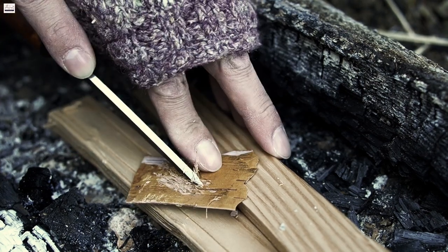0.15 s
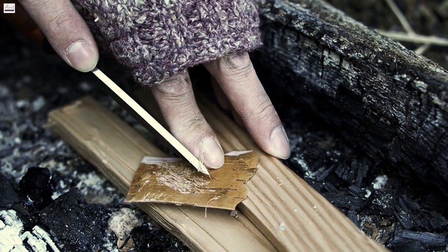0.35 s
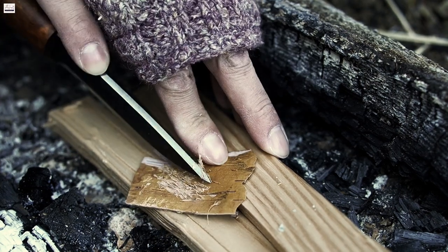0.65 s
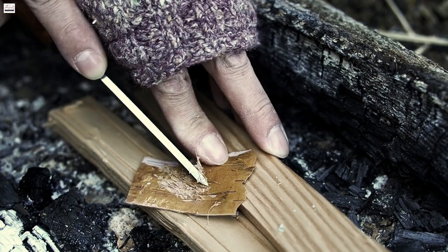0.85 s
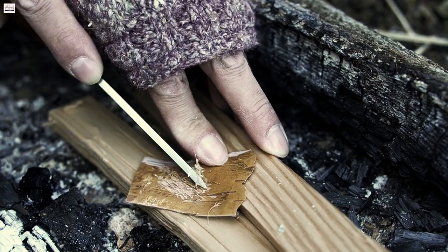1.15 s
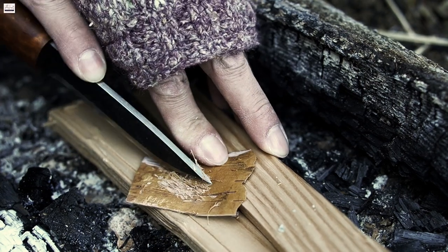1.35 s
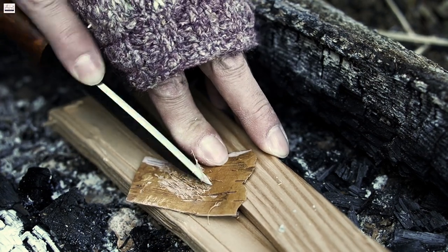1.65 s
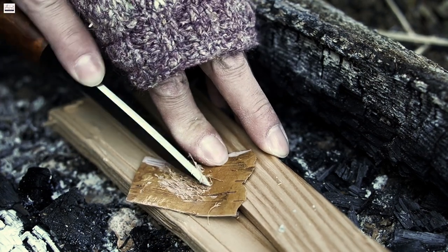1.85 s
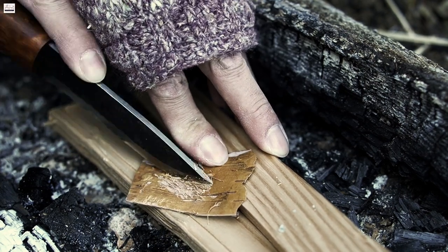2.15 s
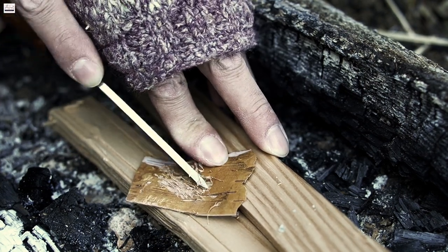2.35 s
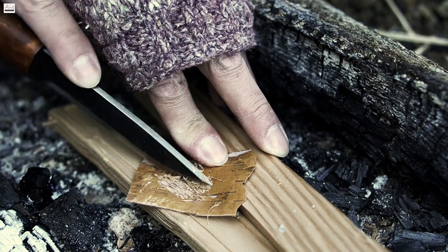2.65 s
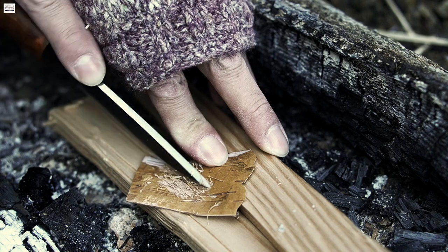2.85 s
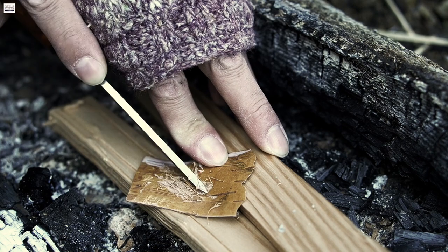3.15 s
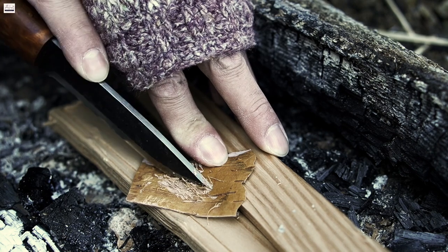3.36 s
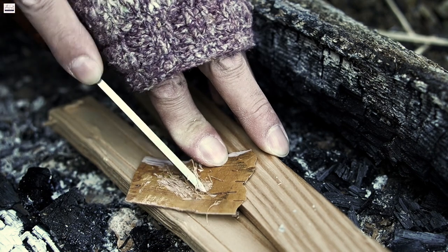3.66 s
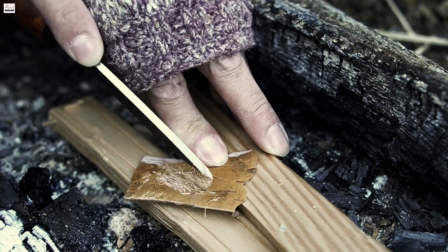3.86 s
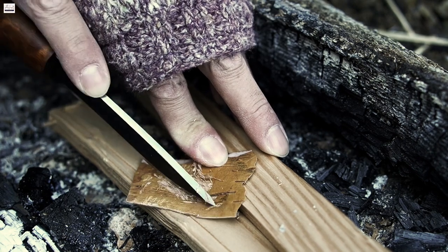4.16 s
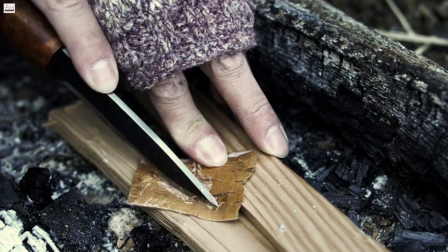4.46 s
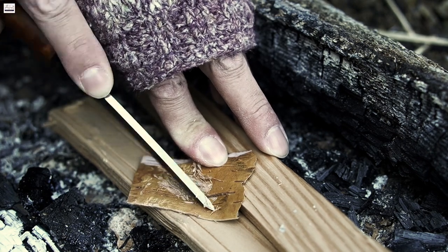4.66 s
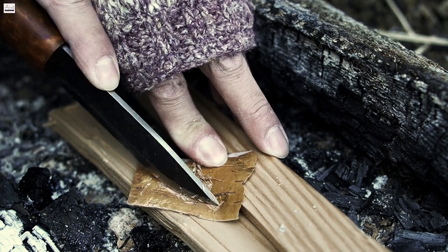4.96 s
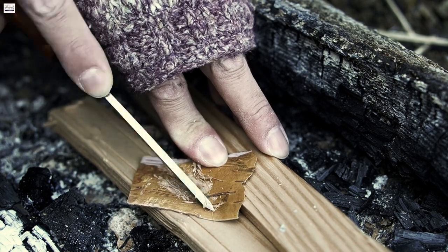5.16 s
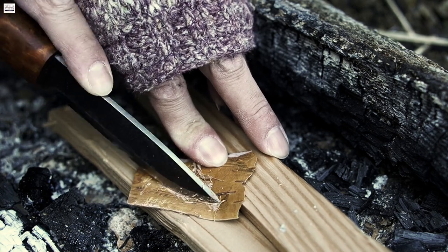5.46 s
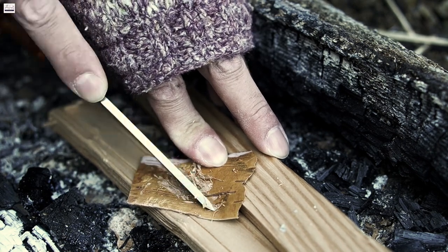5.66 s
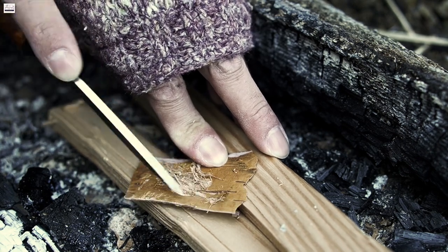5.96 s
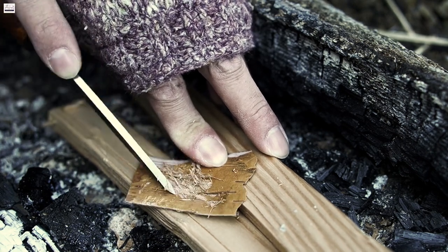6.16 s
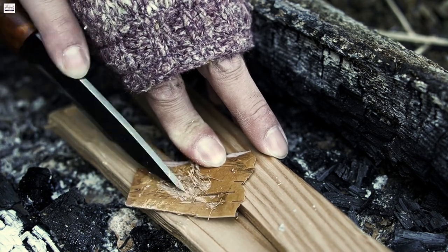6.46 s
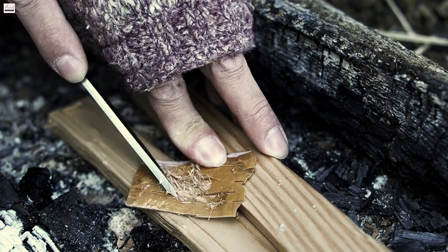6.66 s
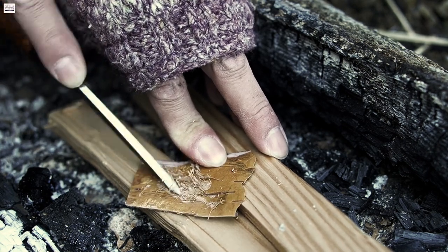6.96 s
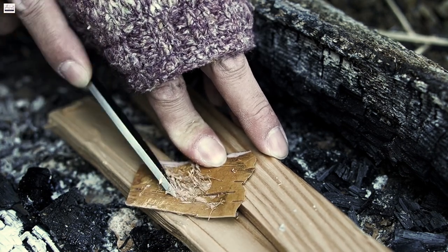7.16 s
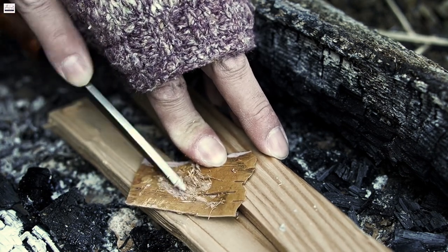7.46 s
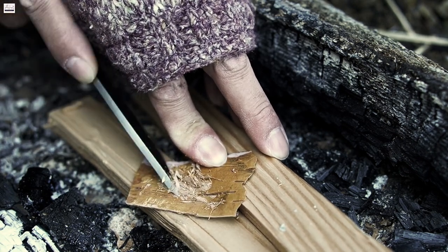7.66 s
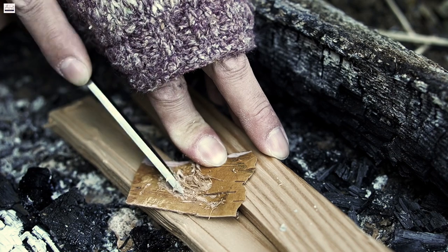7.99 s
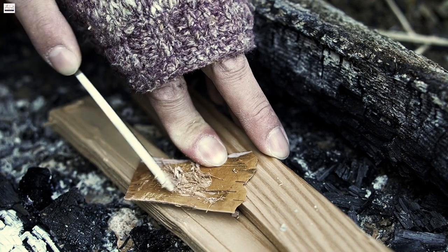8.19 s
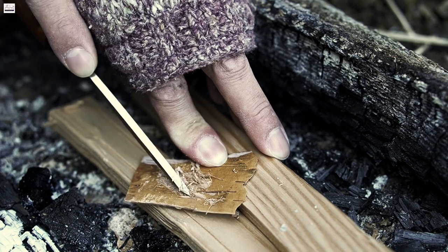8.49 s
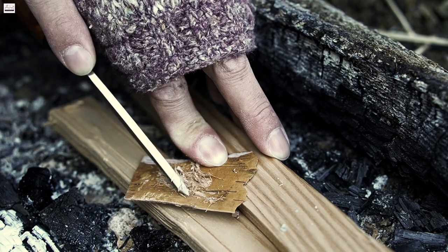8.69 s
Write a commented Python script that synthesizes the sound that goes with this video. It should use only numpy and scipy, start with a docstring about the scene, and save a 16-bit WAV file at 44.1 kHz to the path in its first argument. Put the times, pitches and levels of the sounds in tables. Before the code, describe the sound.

Very close outdoors, a knife edge rasps dry bark held on a split board, about five or six short strokes a second. Brittle flakes snap sharply, the board gives small knocks and low thuds, mostly at the start. Strokes become crisper and cracklier midway, then lighter and thinner. Behind lies a faint steady rush with hiss and a tiny high trill now and then.

```python
"""Scraping bark with a knife edge

A knife edge scrapes a dry strip of bark on a split board, five or six strokes a second, heard close by.
The rasp is random tears ringing the modes of strip and fibres; snapping flakes are short blows to those modes.
The board answers with decaying knocks, a noise-driven rumble and low thuds.
Behind it lie shaped noise, a far rush with a hump near 1 kHz and a hiss, and a faint thin frequency-modulated trill."""
import sys
import numpy as np
from scipy import signal
from scipy.fft import rfft, irfft, next_fast_len
from scipy.io import wavfile
from scipy.ndimage import uniform_filter1d, map_coordinates

SR = 44100
rng = np.random.default_rng(int(sys.argv[2]) if len(sys.argv) > 2 else 0)


def to_wav(s):
    """Save 16-bit WAV."""
    ch = np.atleast_2d(s).T  # columns
    pcm = np.round(np.clip(ch, -1, 1) * 32767)  # PCM
    wavfile.write(sys.argv[1], SR, pcm.astype(np.int16))


N = 389403  # length in samples


def amp(db):
    """Decibels to amplitude ratio: 20 dB is a factor of ten."""
    return 10 ** (np.asarray(db) / 20)


def unit(x):
    """Normalisation to an rms of 1."""
    return x / np.sqrt(np.mean(x ** 2) + 1e-20)


def along(points, hz):
    """Spectral envelope: (Hz, value) points joined on a logarithmic frequency axis."""
    f, v = np.transpose(points)
    return np.interp(np.log(hz + 1), np.log(f + 1), v)


def curves(rows):
    """Linear interpolation: one value per sample for each column after the time."""
    s, *columns = np.transpose(rows)
    return [np.interp(np.arange(N) / SR, s, column) for column in columns]


def wobble(rate):
    """Slow random modulation: a smooth curve through rate random knots a second."""
    knots = rng.standard_normal(int(N * rate / SR) + 4)
    return map_coordinates(knots, [np.arange(N) * rate / SR])


def bumps(rows, rise_db_s, fall_db_s):
    """Exponential growth and decay: the gain rises to each (s, dB) peak and fades."""
    t = np.arange(0, N / SR, .002)
    gain = sum(amp(db - np.maximum(rise_db_s * (s - t), fall_db_s * (t - s))) for s, db in rows)
    return np.interp(np.arange(N) / SR, t, gain)


def filtered(x, response):
    """Linear filtering: the spectrum times a response of frequency, zero-padded."""
    m = next_fast_len(N + SR // 2)
    return irfft(rfft(x, m) * response(np.fft.rfftfreq(m, 1 / SR)), m)[..., :N]


def body(modes, f):
    """Modal superposition: causal resonances summed with alternating sign."""
    total = 0
    for k, (centre, width, db) in enumerate(modes):
        resonance = 1j * f * width / (centre ** 2 - f ** 2 + 1j * f * width)
        total = total + (-1) ** k * amp(db) * resonance
    return total


def grains(rate, spread_db, smooth):
    """Stick-slip excitation: irregular tears of very uneven size on a smooth noise rub."""
    size_db = spread_db * np.minimum(rng.exponential(size=N), 4)
    tears = (rng.random(N) < rate / SR) * amp(size_db) * rng.choice([-1, 1], N)
    return unit(unit(tears) + smooth * rng.standard_normal(N))


def rolled_off(x):
    """Low-pass filtering: the microphone rolls off above 11 kHz, so rasp and snaps lose their top."""
    return signal.sosfilt(signal.butter(4, 11000, fs=SR, output="sos"), x)


# sudden dip and slow return of the background level: start_s, level_db
DIP = [(0, 0), (5.05, -1.5), (5.062, -9), (6.3, -8.5), (8.83, -2)]
# spectral shape of the rush, relative: pitch_hz, density_db (per Hz)
RUSH_COLOUR = [(30, -10.5), (60, 3), (226, -10.5), (450, -8), (617, -8.5), (830, -9), (1030, 3), (1200, -4),
               (1470, -11.5), (2500, -11), (4000, -16), (7700, -22.5), (11500, -23.5), (16000, -27)]
# stereo width of the rush: pitch_hz, side_minus_mid_db
RUSH_WIDTH = [(60, -13), (400, -13), (800, -20), (1300, -94), (5000, -59), (10000, -8.5)]
# spectral shape of the hiss, relative: pitch_hz, density_db (per Hz)
HISS_COLOUR = [(3000, -27.5), (8000, -35), (12000, 6.5), (16000, 6.5)]


def background():
    """Coloured noise: a nearly mono rush that breathes a little, and hiss independent in each channel."""
    breathing = amp(1.1 * wobble(13) + 0.22 * wobble(2.34))
    mid, side = rng.standard_normal((2, N)) * breathing
    mid = filtered(mid, lambda f: amp(along(RUSH_COLOUR, f)))
    side = filtered(side, lambda f: amp(along(RUSH_COLOUR, f)) * amp(along(RUSH_WIDTH, f)))
    rush = np.array([mid + side, mid - side]) / np.std(mid)
    hiss = unit(filtered(rng.standard_normal((2, N)), lambda f: amp(along(HISS_COLOUR, f))))
    return amp(curves(DIP)[0]) * (amp(-46.0) * rush + amp(-60.0) * hiss)


# notes of the thin trill: start_s, end_s, level_db (before the flutter), pitch_hz
TRILL_NOTES = [(.18, .48, -62, 4450), (1.25, 1.4, -65, 4400), (2.02, 2.26, -62, 4400),
               (2.88, 2.96, -62, 4400), (3.7, 4.04, -62, 4450), (5.07, 5.16, -66, 4400),
               (5.29, 5.35, -65, 4400), (5.93, 6.1, -65, 4380), (6.76, 6.92, -64, 4400),
               (7.18, 7.26, -65, 4450), (7.9, 7.99, -64, 4400), (8.5, 8.62, -62, 4330)]


def trill():
    """Frequency modulation: narrow far notes shaken 80 times a second, with a fluttering level."""
    out = np.zeros(N)
    for start, end, db, hz in TRILL_NOTES:
        length = end - start
        t = np.arange(round(length * SR)) / SR
        gate = np.clip(np.minimum(t, length - t) / 0.013, 0, 1)
        phase = 2 * np.pi * hz * t + .9 * np.sin(2 * np.pi * 80 * t)
        out[round(start * SR):][:len(t)] += amp(db) * gate * np.sin(phase)
    return out * (1.1 + .65 * unit(wobble(150)))


# the blade knocks the board: start_s, peak_db, pitch_hz, t60_s
BLADE_KNOCKS = [(0.4918, -21, 677, 0.038), (.636, -17, 1530, 0.004), (3.684, -28, 790, 0.018),
                (4.0665, -17.5, 1310, 0.017), (4.165, -24, 885, 0.013), (5.9055, -31.5, 1690, 0.017)]


def knocks():
    """Free decay: each knock of the blade is one exponentially damped sine."""
    out, t = np.zeros(N + SR), np.arange(SR // 10) / SR
    for s, db, hz, t60 in BLADE_KNOCKS:
        out[round(s * SR):][:len(t)] += amp(db - 60 * t / t60) * np.sin(2 * np.pi * hz * t)
    return out[:N]


# resonances of the board on the ground: pitch_hz, width_hz, level_db
BOARD_MODES = [(160, 37, -1.5), (298.7, 37, 0.5), (495, 92, -7), (901, 63, 1)]
# rumble level before its lumps: start_s, level_db
RUMBLE_LEVEL = [(0, -49), (.8, -54.5), (2, -56), (3.5, -52.5), (5.05, -57), (5.07, -63), (6.5, -60),
                (7.6, -54.5), (8.83, -58)]
RUMBLE_LUMPS_DB = 3.8


def rumble():
    """Forced vibration: irregular pushes drive the board's modes in uneven lumps."""
    pushes = grains(60, spread_db=3, smooth=.7)
    driven = filtered(pushes, lambda f: body(BOARD_MODES, f) * body([(397, 2200, 0)], f))
    return amp(curves(RUMBLE_LEVEL)[0] + RUMBLE_LUMPS_DB * wobble(22)) * unit(driven)


# the board rocking under the hand: start_s (of the peak), level_db
ROCKING = [(.05, -30), (.17, -34.5), (.42, -35), (.54, -35), (.62, -36), (.69, -40), (.8, -52), (1.28, -44),
           (1.62, -40.5), (1.79, -42), (2.02, -53), (2.21, -54), (2.41, -54), (2.61, -50), (2.78, -45),
           (2.97, -45), (3.54, -56), (3.69, -47), (3.86, -44), (4.085, -39), (4.17, -46), (4.77, -44),
           (5.02, -46), (5.58, -54), (5.7, -48), (6.2, -47), (6.32, -54), (6.44, -49), (6.86, -50),
           (7.01, -60), (7.16, -50), (7.8, -47), (8.19, -49), (8.36, -50), (8.48, -44)]
THUD_RISE_DB_S, THUD_FALL_DB_S = 314, 261


def thuds():
    """Low-mode resonance: one mode of wandering pitch swells at each rocking of the board."""
    low_hz = 68 + 6 * wobble(14)
    phase = 2 * np.pi * np.cumsum(low_hz) / SR
    return bumps(ROCKING, THUD_RISE_DB_S, THUD_FALL_DB_S) * np.sin(phase)


# partials of a short falling squeak: pitch_hz (at its start), level_db (before wobble and decay)
SQUEAK_PARTIALS = [(2350, -32.5), (2750, -39), (4230, -39), (5950, -49), (7600, -41.5)]


def squeak():
    """Frictional vibration: a few fuzzy partials that sag as the edge slows."""
    t = np.arange(N) / SR - .103  # seconds since the squeak starts
    swell = np.clip(t / 0.002814, 0, 1) * amp(-400 * np.clip(t, 0, 1))
    sag = t - .5 * t * np.clip(t, 0, .1)  # slowed time lowers every partial alike
    return swell * sum(amp(db) * wobble(300) * np.sin(2 * np.pi * hz * sag) for hz, db in SQUEAK_PARTIALS)


# passes of the edge: start_s, peak_s, end_s, strip_level_db, strip_centre_hz, fibre_level_db, fibre_centre_hz
PASSES = [(-.05, 0.033, .09, -41, 2500, -45.5, 7400), (0.098, 0.11, .15, -44, 2330, -42.5, 6910),
          (0.36, 0.37, .46, -43.5, 2650, -46.5, 7000), (0.514, .541, .565, -52, 2460, -62, 7500),
          (0.583, 0.646, .68, -40.5, 2570, -47, 7050), (.64, 0.738, .9, -47.5, 2870, -49.5, 6250),
          (0.9, 1.044, 1.12, -44, 2620, -49.5, 5910), (1.11, 1.188, 1.3, -44, 3030, -45, 5600),
          (1.293, 1.345, 1.48, -47, 2950, -46.5, 6190), (1.478, 1.57, 1.66, -44, 2950, -46, 6100),
          (1.663, 1.74, 1.87, -43.5, 2910, -45.5, 6630), (1.88, 1.975, 2.04, -44.5, 3045, -46, 6430),
          (2.063, 2.14, 2.27, -45, 2920, -47, 6480), (2.26, 2.364, 2.5, -48, 2970, -49, 6110),
          (2.5, 2.552, 2.68, -43, 2965, -42.5, 6300), (2.674, 2.763, 2.87, -45, 3120, -41.5, 6600),
          (2.876, 2.985, 3.07, -45, 2930, -44.5, 6400), (3.04, 3.164, 3.23, -47, 3200, -45, 7400),
          (3.236, 3.37, 3.44, -45.5, 2780, -45, 6500), (3.44, 3.52, 3.7, -46, 2990, -46.5, 6710),
          (3.672, 3.814, 3.835, -44, 2560, -45, 6840), (4.06, 4.073, 4.13, -48, 2200, -48, 6550),
          (4.133, 4.172, 4.21, -40, 2370, -37, 6380), (4.19, 4.216, 4.28, -38.5, 2470, -40, 6520),
          (4.276, 4.345, 4.4, -42, 2620, -39, 7060), (4.38, 4.492, 4.6, -41.5, 2660, -41.5, 7020),
          (4.592, 4.772, 4.87, -41.5, 2710, -43.5, 6140), (4.873, 4.958, 5.06, -45.5, 2730, -47.5, 6670),
          (5.128, 5.163, 5.24, -48.5, 2670, -50, 7280), (5.192, 5.247, 5.275, -49, 2720, -49.5, 6230),
          (5.248, 5.287, 5.33, -49, 2840, -56, 6800), (5.34, 5.437, 5.5, -49, 2900, -50, 6900),
          (5.47, 5.514, 5.54, -51, 2700, -51, 6920), (5.602, 5.69, 5.82, -46.5, 2770, -46, 6700),
          (5.957, 5.972, 5.99, -59, 2600, -52, 7500), (5.856, 5.926, 5.96, -51, 2670, -50, 6760),
          (6.156, 6.154, 6.2, -55, 2280, -52, 5800), (6.2, 6.307, 6.38, -51, 2640, -49, 6240),
          (6.344, 6.506, 6.57, -48.5, 2660, -44, 6310), (6.564, 6.695, 6.755, -54, 2340, -46.5, 6760),
          (6.76, 6.837, 6.96, -53, 2325, -44.5, 6400), (6.938, 7.046, 7.1, -54, 2520, -47, 6940),
          (7.097, 7.137, 7.165, -42.5, 2500, -48, 6680), (7.26, 7.283, 7.315, -52, 2620, -49, 7000),
          (7.313, 7.352, 7.49, -46, 2690, -40.5, 7200), (7.475, 7.54, 7.62, -48.5, 2600, -45, 6900),
          (7.614, 7.658, 7.715, -51.5, 2580, -52, 7190), (7.72, 7.83, 7.96, -49, 2660, -43, 7100),
          (7.95, 8.03, 8.11, -51, 2470, -46.5, 7400), (8.1, 8.217, 8.235, -52, 2200, -52, 6100),
          (8.393, 8.432, 8.5, -53.5, 2500, -50, 6700), (8.61, 8.737, 8.79, -51, 2800, -48.5, 5950),
          (8.776, 8.838, 8.9, -49.5, 2700, -47, 6060)]
REST_DB = -63  # the edge stays on the bark between strokes
SAG_DB = 8.5  # slow fall away from the peak
STRIP_EDGE_DB, FIBRE_EDGE_DB, ROUNDNESS = 11.5, 11.5, 3.1  # steep fall at both ends, and its abruptness


def swells(peak_db, edge_db):
    """Addition of powers: the level in dB as each stroke swells to its peak, sags and stops."""
    t = np.arange(0, N / SR, .002)
    power = amp(REST_DB + np.interp(t, *np.transpose(DIP))) ** 2
    for (start, peak, end, *_), db in zip(PASSES, peak_db):
        # 0 at the peak, 1 at either end of the stroke
        away = np.where(t < peak, (peak - t) / abs(peak - start), (t - peak) / abs(end - peak))
        power = power + amp(db - SAG_DB * away - edge_db * away ** ROUNDNESS) ** 2
    return np.interp(np.arange(N) / SR, t, 10 * np.log10(power))


def voice(part):
    """Source control: level in dB and centre in Hz of strip (0) or fibres (1) along the strokes."""
    rows = np.array(PASSES)
    level_db = swells(rows[:, 3 + 2 * part], (STRIP_EDGE_DB, FIBRE_EDGE_DB)[part])
    centre_hz = curves(rows[:, [1, 4 + 2 * part]])[0]
    return level_db, centre_hz


CHIP_STRIP_DB, CHIP_FIBRE_DB = 7.5, 10.5  # mean peak over the rasp level
CHIP_SCATTER_DB, CHIP_PITCH_SPREAD = 3, 0.081  # standard deviations, pitch in log frequency


def chips(count):
    """Random events: small flakes at chance moments, their strength following the stroke under them."""
    at, draw = rng.integers(0, N, count), rng.standard_normal((count, 4))
    (strip_db, strip_hz), (fibre_db, fibre_hz) = voice(0), voice(1)
    pitch = np.exp(CHIP_PITCH_SPREAD * draw[:, 2:])
    low_db = strip_db[at] + CHIP_STRIP_DB + CHIP_SCATTER_DB * draw[:, 0]
    high_db = fibre_db[at] + CHIP_FIBRE_DB + CHIP_SCATTER_DB * draw[:, 1]
    low_hz, high_hz = strip_hz[at] * pitch[:, 0], fibre_hz[at] * pitch[:, 1]
    return list(zip(at / SR, low_db, low_hz, high_db, high_hz, high_db - 26))


def ring(modes, hz, reach, rumple, t60):
    """Impulse response: a blow and a dying rattle through the modes nearest hz, scaled to peak 1."""
    size = 1024
    f, t = np.fft.rfftfreq(size, 1 / SR), np.arange(size) / SR
    force = rumple * rng.standard_normal(size) * amp(-60 * t / t60)
    force[0] = 1
    # each break detunes the modes a little and weakens those far from hz
    near = [(c * (1 + rng.normal(0, .035)), w, db - reach * np.log2(c / hz) ** 2) for c, w, db in modes]
    flake = body([(hz, 0.12 * hz, -6)], f)  # the loose flake adds a pitch of its own
    y = irfft(rfft(force) * (body(near, f) + flake) * body([(hz, 1.46 * hz, 0)], f), size)
    return y / np.abs(y).max()


# resonances of the bark strip: pitch_hz, width_hz, level_db
STRIP_MODES = [(1614, 194, 0), (2190, 343, 4.5), (2810, 335, 7.5), (3720, 1840, 0)]
# resonances of its torn fibres: pitch_hz, width_hz, level_db
FIBRE_MODES = [(4500, 1220, 1.5), (6310, 850, 1.5), (7840, 990, -0.5), (10500, 1000, -3)]
# louder flakes, peaks before the roll-off: start_s, strip_peak_db, strip_hz, fibre_peak_db, fibre_hz,
# crack_peak_db (thin crack, not rolled off)
FLAKES = [(0.3641, -25.5, 2640, -37, 6603, -60), (0.4904, -12.5, 2440, -12.5, 6200, -60),
          (.536, -27.5, 2393, -29, 5100, -60), (0.5838, -23.5, 2458, -41, 6060, -60),
          (.63, -21, 2810, -25, 8270, -60), (0.6364, -9.5, 2706, -13.5, 6600, -60),
          (.6794, -43, 2280, -19, 8490, -60), (.687, -23.5, 3100, -23.5, 4460, -60),
          (0.699, -34.5, 2760, -14, 8200, -60), (.7261, -24, 2930, -25, 6000, -44),
          (0.7387, -21.5, 3200, -17, 5521, -60), (.7453, -26, 2900, -15.5, 5650, -60),
          (0.817, -28, 2374, -50.5, 6510, -60), (1.2673, -26, 3570, -48, 4960, -60),
          (1.3382, -24, 3100, -23.5, 7660, -60), (1.5932, -28, 2450, -44, 7230, -60),
          (1.758, -38, 2740, -23, 5540, -60), (1.8204, -33, 3470, -27, 5610, -60),
          (1.9737, -11.5, 3480, -7, 7340, -15), (2.228, -12.5, 2780, -23, 4540, -60),
          (2.2285, -17.5, 1970, -12, 4430, -60), (2.4498, -50.5, 2880, -30, 5900, -60),
          (2.7591, -21.5, 3100, -30, 6200, -60), (2.7741, -29, 3030, -27, 6530, -60),
          (2.7967, -33, 3070, -27, 8600, -60), (2.7851, -27.5, 2970, -27, 7260, -60),
          (2.9018, -39.5, 2970, -27, 7280, -60), (2.9356, -34, 2980, -24.5, 6740, -60),
          (3.0182, -10.5, 3041, -6, 6040, -32), (3.037, -34, 3300, -21.5, 7630, -60),
          (3.127, -25, 3043, -37, 7410, -60), (3.1436, -31, 3080, -25, 7640, -60),
          (3.1803, -28, 3080, -28, 5210, -60), (3.3745, -35, 3203, -29, 7330, -60),
          (3.396, -26.5, 3050, -39.5, 5990, -60), (3.6848, -32, 2870, -43, 5210, -60),
          (3.8271, -30, 2680, -27, 6300, -60), (3.869, -27.5, 2630, -44.5, 6680, -60),
          (4.0671, -14.5, 1746, -18, 4480, -60), (4.068, -20, 2205, -34, 4670, -60),
          (4.0831, -14, 2400, -14.5, 7500, -37.5), (4.0855, -28, 2420, -26, 5410, -60),
          (4.1462, -27, 2310, -21.5, 6440, -60), (4.1588, -26, 2300, -25, 7290, -60),
          (4.1644, -2, 1960, -14.5, 6297, -38.5), (4.1673, -33.5, 2150, -16, 7180, -60),
          (4.1718, -20, 2330, -17, 5800, -60), (4.18, -15, 1960, -21, 6457, -60),
          (4.2023, -26, 2480, -22, 6440, -60), (4.2103, -17, 3100, -15, 5070, -40),
          (4.2216, -22, 2482, -19, 7660, -27.5), (4.2327, -23, 2260, -21, 7450, -45),
          (4.3193, -23, 2500, -17.5, 6090, -39.5), (4.3608, -23.5, 2385, -16, 6770, -45),
          (4.373, -32, 2660, -21.5, 6129, -60), (4.4746, -31, 3000, -19, 5790, -45),
          (4.487, -28, 2720, -11, 6400, -49), (4.536, -29, 2690, -6.5, 8512, -40),
          (4.689, -27, 1920, -39, 6490, -60), (4.702, -28, 3200, -18, 8600, -45),
          (4.75, -20, 2661, -23, 4580, -60), (4.7663, -30, 2760, -15, 5900, -60),
          (4.7707, -32, 2820, -25, 6201, -60), (4.8208, -24, 2843, -40.5, 5460, -60),
          (4.9362, -31, 2740, -25, 6800, -60), (4.9583, -18, 2802, -16, 6650, -37),
          (4.99, -26.5, 2810, -36, 7250, -45), (5.0181, -13, 2760, -6, 7223, -30),
          (5.0268, -28, 3050, -24.5, 5260, -60), (5.0472, -11, 2800, -3.5, 7340, -28.5),
          (5.0538, -22, 2750, -18, 7640, -60), (5.076, -33.5, 2860, -26.5, 7780, -60),
          (5.237, -31, 2940, -19.5, 5760, -60), (5.3027, -29, 2820, -36, 8556, -60),
          (5.437, -41, 2960, -20.5, 6420, -60), (5.5052, -22, 2630, -13, 7400, -34.5),
          (5.5133, -35, 3000, -24, 6700, -60), (5.5262, -36, 2720, -27, 6790, -60),
          (5.5754, -48.5, 2570, -34, 6800, -60), (5.6698, -30, 2521, -23, 6400, -60),
          (5.6894, -29.5, 3120, -25, 6210, -60), (5.7503, -27.5, 3060, -16, 5980, -60),
          (5.9046, -24.5, 2421, -21, 4900, -63), (6.1656, -39, 2850, -27.5, 6400, -60),
          (6.2537, -33, 3390, -31, 4670, -60), (6.489, -27.5, 2905, -33, 6230, -60),
          (6.534, -34, 2422, -25, 6545, -60), (6.6453, -39, 3000, -24.5, 7400, -60),
          (6.707, -33.5, 2620, -25, 6300, -60), (6.837, -42, 2040, -33, 6117, -60),
          (6.9251, -31.5, 2458, -1.5, 7750, -41), (7.0476, -43, 2580, -22, 7480, -60),
          (7.0715, -29, 3350, -16, 7672, -34), (7.1114, -44, 2900, -27, 6830, -60),
          (7.1281, -19, 2350, -17, 6600, -60), (7.325, -46.5, 2840, -25, 7600, -60),
          (7.334, -39, 3060, -24, 6890, -60), (7.3416, -41, 3170, -24, 7460, -42.5),
          (7.352, -32, 3105, -11.5, 6640, -35.5), (7.3853, -41.5, 2680, -25, 7140, -60),
          (7.3985, -43.5, 2820, -22, 7150, -60), (7.5414, -41, 2550, -25, 8240, -60),
          (7.55, -22, 2360, -24, 5340, -60), (7.5786, -36.5, 2850, -26, 7607, -60),
          (7.8286, -35, 2016, -12, 7500, -39), (7.8587, -39, 2960, -25, 7510, -60),
          (8.036, -38.5, 2340, -23.5, 8500, -60), (8.1929, -21, 3300, -17, 5360, -60),
          (8.329, -23, 3774, -14, 5670, -60), (8.4272, -29, 2540, -23.5, 6766, -60),
          (8.4678, -26.5, 2457, -16.5, 6300, -42.5), (8.4723, -30, 3120, -21, 6800, -60)]


def snaps():
    """Impulsive excitation: each flake rings strip and fibres at its own strengths, slightly off centre."""
    out, thin = np.zeros((2, N + SR)), np.zeros(N + SR)
    for s, strip_db, strip_hz, fibre_db, fibre_hz, crack_db in [*FLAKES, *chips(count=120)]:
        low = amp(strip_db) * ring(STRIP_MODES, strip_hz, reach=33.6, rumple=0.068, t60=0.016)
        high = amp(fibre_db) * ring(FIBRE_MODES, fibre_hz, reach=21.3, rumple=0.086, t60=0.011)
        jolt = amp(strip_db - 12.5) * ring([(1540, 4200, 0)], 1300, reach=0, rumple=0.11, t60=0.0098)
        aside = 0.052 * amp(fibre_db) * ring(FIBRE_MODES, fibre_hz, reach=9.87, rumple=0.15, t60=0.012)
        crack = amp(crack_db) * ring([(13800, 3200, 0)], 11400, reach=0, rumple=0.59, t60=0.0044)
        sides = np.outer([1, -1], aside) * rng.choice([-1, 1])  # opposite sign in the two channels
        at = round(s * SR)
        out[:, at:][:, :len(low)] += low + high + jolt + sides
        thin[at:][:len(low)] += crack
    return (rolled_off(out) + thin)[:, :N]


# the loose end of the strip buzzes, later strokes only: start_s (of the peak), level_db
LOOSE_END = [(6.26, -58), (6.52, -58), (6.71, -56), (6.83, -58), (6.93, -54), (7.13, -49), (7.35, -48),
             (7.42, -58), (7.55, -47), (7.67, -58), (7.84, -56), (8.04, -52), (8.34, -61), (8.47, -52)]


def flaps(rub):
    """Sympathetic resonance: the rub sets the loose end buzzing near 1.7 kHz."""
    buzz = unit(filtered(rub, lambda f: body([(1667, 270, 0)], f) ** 2))
    return bumps(LOOSE_END, rise_db_s=400, fall_db_s=400) * buzz


def scraped(control, response, rest_hz, follow, force, patchy_db):
    """Time-varying filtering: tears ring sliding modes; each patch of bark favours other frequencies."""
    level_db, centre_hz = control
    f, t, z = signal.stft(force, SR, nperseg=256, noverlap=192)
    centre = np.interp(t * SR, np.arange(N), centre_hz)
    slide = np.clip(centre / rest_hz, .85, 1.25) ** follow  # follow below 1: modes move less than the centre
    patches = uniform_filter1d(rng.standard_normal(z.shape), size=8, axis=0)
    patches = uniform_filter1d(patches, size=4, axis=1)
    z = z * response(f[:, None] / slide) * amp(patchy_db * unit(patches))
    return amp(level_db) * unit(signal.istft(z, SR, nperseg=256, noverlap=192)[1][:N])


def rasp():
    """Stick-slip friction: tears clump as the edge catches and slips; strip and fibres share some."""
    catch = wobble(70)
    shared = grains(600, spread_db=5, smooth=.5)
    rub = amp(2.1 * catch) * (shared + 1.5 * grains(700, spread_db=4, smooth=0.73))
    tear = amp(2.508 * catch) * (shared + 1.08 * grains(400, spread_db=4, smooth=.55))
    strip_response = lambda f: body(STRIP_MODES, f) * body([(2790, 590, 0)], f)
    fibre_response = lambda f: body(FIBRE_MODES, f) * body([(7370, 7000, 0)], f) ** 2
    strip = scraped(voice(0), strip_response, rest_hz=2830, follow=0.87, force=rub, patchy_db=2.8)
    fibre = scraped(voice(1), fibre_response, rest_hz=6930.0, follow=0.39, force=tear, patchy_db=2.7)
    return rolled_off(strip + fibre + flaps(rub))


def scene():
    """Linear superposition of all sources; only snaps and background differ between the channels."""
    board = knocks() + rumble() + thuds()
    return background() + trill() + board + squeak() + snaps() + rasp()


def record(dry):
    """Band limiting and clipping: nothing from 15.9 kHz up passes the filter, then peaks stop at 0.99."""
    return np.clip(filtered(dry, lambda hz: hz < 15900), -.99, .99)


dry = scene()
out = record(dry)
to_wav(out)
```